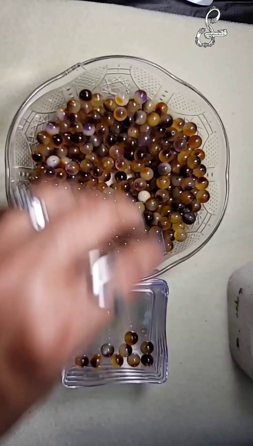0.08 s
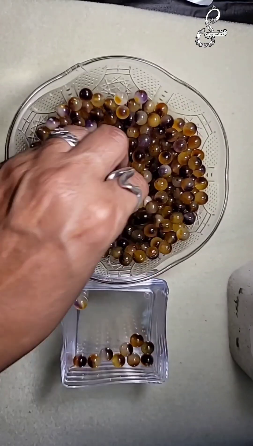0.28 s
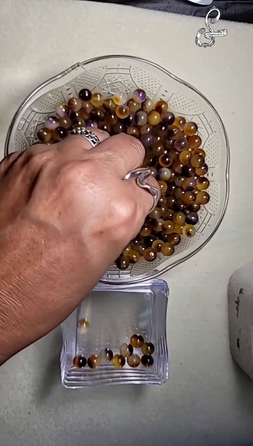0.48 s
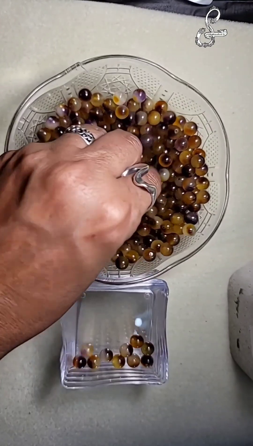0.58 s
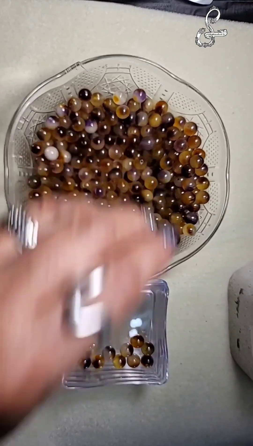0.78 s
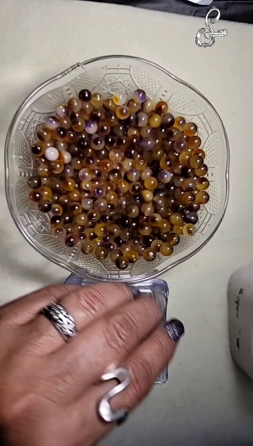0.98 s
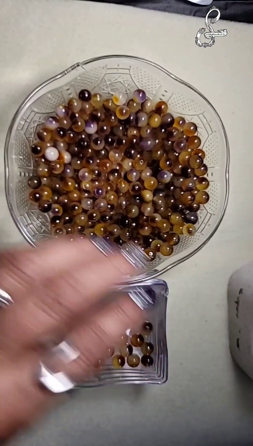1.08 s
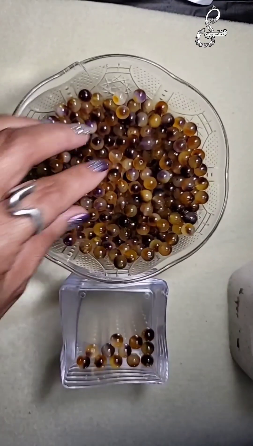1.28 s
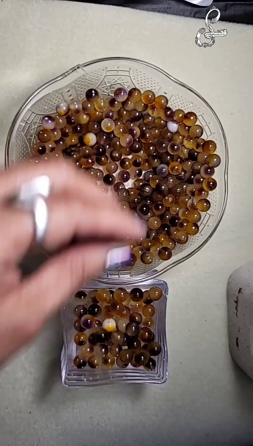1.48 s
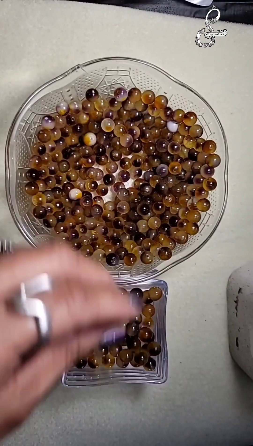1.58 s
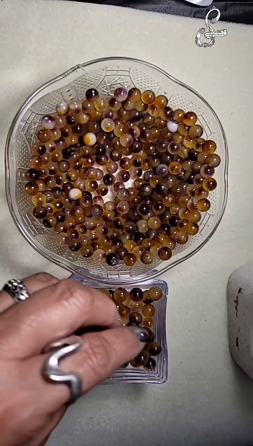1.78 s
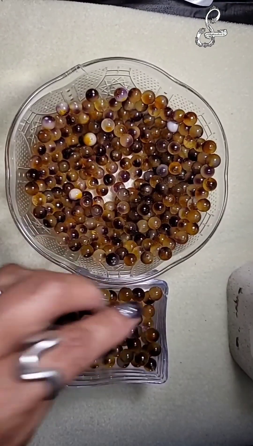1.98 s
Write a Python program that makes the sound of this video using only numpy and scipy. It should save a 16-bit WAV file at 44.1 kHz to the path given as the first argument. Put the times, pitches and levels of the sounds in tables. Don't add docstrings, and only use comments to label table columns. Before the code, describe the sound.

Close stereo phone pickup of stone beads: a brief bright clatter in a box at right, a crunchy bowl rattle at left, another drop, a small scrape, an abrupt cut, low room hum beneath.

```python
import sys
import numpy as np
from scipy import signal
from scipy.fft import rfft, irfft, next_fast_len
from scipy.io import wavfile
from scipy.ndimage import map_coordinates

SR = 44100
rng = np.random.default_rng(int(sys.argv[2]) if len(sys.argv) > 2 else 0)


def volts_from_decibels(level):
    exponent = np.asarray(level, float) / 20
    return 10 ** exponent


def persist_wave(psi):
    counts = np.round(np.clip(psi, -1, 1) * 32767).astype(np.int16)
    wavfile.write(sys.argv[1], SR, np.atleast_2d(counts).T)


N = 88200

# start in seconds, peak in dB, level of the low modes in dB, favoured pitch in Hz.
BOX_HITS = [(0.2274, -9, -6, 1997), (0.232, -15, -4.5, 2024), (0.2437, -12.5, -4, 1975),
            (0.2525, -30, -7.5, 1910), (0.2613, -6, -6.5, 974), (0.2855, -12.5, -8.5, 2906),
            (0.294, -24, -4, 4130), (0.299, -11.5, -4, 2816), (0.3155, -22.5, -8.5, 5510),
            (0.322, -32.5, -13.5, 2890), (0.3553, -41.5, -16, 2370), (0.3678, -37.5, -9.5, 2410),
            (0.3804, -37, -5.5, 2910), (1.1656, -42.5, -6, 4780), (1.1914, -8.5, -3, 2080),
            (1.2106, -9.5, -4, 1974), (1.2169, -17, -2, 4390), (1.2232, -16.5, -8.5, 1610),
            (1.227, -23, -2.5, 5320), (1.2375, -8, -4.5, 3400), (1.254, -29.5, -9, 2030),
            (1.2616, -11.5, -4, 2140), (1.2768, -25, 0.5, 2260), (1.3023, -18.5, -11.5, 5190),
            (1.3178, -22.5, -5, 1230), (1.3534, -26, -7, 5740), (1.3686, -34, -1, 2450),
            (1.4109, -34.5, 1, 2410), (1.4262, -25, -13, 4770), (1.4919, -38.5, -18, 5130)]
# time in seconds, effort in dB.
BOX_ROLLS = [
    [(0, -50.5), (.03, -67), (.07, -72)],
    [(.228, -19), (.25, -38), (.27, -36.5), (.32, -38), (.335, -58), (.37, -54), (.39, -67), (.40, -75)],
    [(1.183, -54.5), (1.192, -32), (1.225, -32), (1.27, -39), (1.29, -55), (1.325, -37.5), (1.34, -54),
     (1.39, -70), (1.43, -70), (1.555, -60), (1.565, -60)],
]
# time in seconds, effort in dB.
BOX_SLIDES = [
    [(.335, -62), (.36, -48), (.39, -55)],
    [(1.40, -59), (1.43, -50.5), (1.55, -62), (1.57, -66)],
]
# start in seconds, peak in dB, level of the low modes in dB, favoured pitch in Hz.
GRAB_HITS = [(1.6, -31.5, 2, 2340), (1.613, -21.5, -5, 1720), (1.622, -22.5, -17, 3000),
             (1.627, -15, -38, 2920), (1.646, -11.5, 0.5, 1286)]
# time in seconds, effort in dB.
GRAB_EFFORT = [(1.57, -75), (1.59, -58), (1.598, -42), (1.609, -48), (1.615, -38), (1.638, -29),
               (1.647, -25.5), (1.66, -22.5)]
# start in seconds, peak in dB, level of the low modes in dB, favoured pitch in Hz.
BOWL_HITS = [(0.4282, -13.5, -5.5, 3220), (0.4398, -17, -3.5, 1960), (0.4483, -6.5, -8.5, 1980),
             (0.4573, -10, -4.5, 2270), (0.4632, -6.5, 0, 1905), (0.4689, -6, -5.5, 1850),
             (0.4733, -6.5, -11, 2150), (0.4842, -4, -6.5, 1780), (0.4899, -1, -4.5, 4410),
             (0.4957, -10.5, -7.5, 3140), (0.5003, -10.5, -10.5, 2650), (0.5078, -0.5, -11.5, 3540),
             (0.5217, -8, -5.5, 3170), (0.5328, -13, -16, 3500), (0.5409, -13.5, -8.5, 4170),
             (0.5507, -14.5, -11.5, 3840), (0.564, -7.5, -25, 5140), (0.5768, -12.5, -6.5, 1800),
             (0.5851, -16.5, -5, 5440), (0.593, -8, -12, 3770), (0.6006, -22, -11, 4740),
             (0.6096, -9, -6.5, 3700), (0.6348, -17, -18, 1980), (0.6405, -7.5, -9, 3780),
             (0.6461, -15, -14.5, 5560), (0.6537, -10, -18, 3940), (0.6588, -23.5, -9, 1440),
             (0.6678, -14, -1, 3320), (0.6748, -16, -4, 3040), (0.6846, -4, -12.5, 2840),
             (0.6913, -14, -9, 1620), (0.7132, -19.5, -12, 5210), (0.7252, -16, -10, 5450),
             (0.733, -18.5, -6.5, 3680), (0.7416, -35, -6, 1290), (0.7506, -20, -14, 4260),
             (0.7578, -14, -1.5, 1550), (0.7729, -14, -13, 2870), (0.7915, -19, -13, 5840),
             (0.8039, -17, -3.5, 4970), (0.8194, -18.5, -4, 2350), (0.8325, -15, -5.5, 2380),
             (0.8391, -12.5, -7, 2950), (0.8454, -14, -3, 1630), (0.854, -13, -11, 2250),
             (0.8647, -24, 0, 2330), (0.8747, -20, -19, 2690), (0.8839, -22, -14, 4200)]
# start in seconds, peak in dB, level of the low modes in dB, favoured pitch in Hz.
LAST_HITS = [(.8988, -24, -11, 1700), (.9147, -16, -6.5, 1750), (.9533, -7, 4.5, 5000),
             (.9718, -16.5, 0, 2280), (.9765, -32, 0.5, 1810), (.9827, -9.5, 1.5, 4270),
             (.9892, -27.5, 1, 2300), (1.025, -21.5, -3, 1870), (1.0509, -27, -5.5, 3900)]
# time in seconds, effort in dB.
STIR_EFFORT = [(.42, -40.5), (.436, -26), (.447, -22.5), (.47, -20.5), (.51, -24.5), (.535, -29),
               (.56, -34.5), (.60, -28), (.63, -34), (.685, -27), (.705, -34.5), (.725, -47), (.80, -38.5),
               (.83, -45), (.86, -30.5), (.89, -52.5), (.94, -57.5), (1.07, -70)]
# start in seconds, pitch in Hz, level in dB.
THUMPS = [
    (0.443, 222.7, -33),
    (0.491, 340, -30.5),
]
# pitch in Hz, level in dB, 60 dB decay in seconds.
BOX_MODES = [(1037, 4, 0.029), (1117, 2, 0.018), (1550, -13.5, 0.046), (2001, -3, 0.044),
             (2051, -1.5, 0.042), (2410, -12, 0.096), (3000, -13.5, 0.014), (3370, -13, .015),
             (4750, -10.5, 0.029), (5520, -11.5, 0.042), (7070, -14, 0.023), (8760, -19, 0.014),
             (9850, -7.5, 0.021)]
# pitch in Hz, level in dB, 60 dB decay in seconds.
BOWL_MODES = [(1248, -5.5, 0.0092), (1655, 0, 0.018), (1830, -1.5, 0.024), (2110, -8, .014),
              (2323, -1.5, 0.014), (2832, -20.5, 0.051), (3180, -11, 0.0092), (3896, -8, 0.013),
              (4880, -12, 0.02), (5450, -17, .012), (6720, -14, 0.012), (10050, -8.5, 0.0082)]
# pitch in Hz, level in dB, 60 dB decay in seconds.
SLIDE_MODES = [(1450, -3, .02), (1750, -2, .03), (2590, 4.5, 0.016), (5020, -6.5, 0.027), (5310, -8.5, .03)]
# frequency in Hz, level in dB.
CRACK = [(600, -28), (900, -15), (1500, -1), (3000, -3.5), (6000, -6.5), (8000, -10), (10300, -6.5),
         (12500, -25.5)]
# frequency in Hz, correlation from 0 to 1.
CRACK_ALIKE = [(700, 0.53), (2000, 0.87), (5000, 0.18), (10000, 0.21)]
# frequency in Hz, left over right in dB.
BOX_SIDE = [(400, -14), (1150, 6.5), (2100, -3.3), (3700, -0.5), (6700, -3), (12000, -5)]
# frequency in Hz, left over right in dB.
BOWL_SIDE = [(400, -1), (1100, 9), (2100, 3), (3700, 5), (6700, 1), (12000, 1)]
# pitch in Hz, rms level in dB.
HUM = [(60, -42), (121, -53.5), (150, -53)]
# frequency in Hz, level in dB.
FLOOR = [(15, -31), (25, -18.5), (68, -4), (161, -8), (979, -30), (1480, -37), (10000, -61.5),
         (12000, -81.5), (22000, -120)]
# frequency in Hz, correlation from 0 to 1.
FLOOR_ALIKE = [(60, 0.87), (250, 0.96), (600, 0.45), (2000, 0.093)]
# time in seconds, gain in dB.
EDIT = [
    (0, 0.5),
    (1.653, 1),
    (1.658, -45.5),
    (1.70, -53),
    (1.72, -90.5),
    (1.93, -101),
    (1.965, -34),
    (1.975, -20),
    (2, -3.5),
]
# pitch in Hz, level in dB.
AFTER = [(2810, -74), (10400, -63)]

FLOOR_DB, TOP_HZ = -37, 11700
LOW_HZ = 2500
FAVOUR_DB, FAVOUR_OCTAVES = 9.5, 0.12
RISE_S = 0.0003


def box():
    hits = clatter(BOX_HITS, BOX_MODES, ring_db=-6.5, damp=0.96, crack_db=-9.5, crack_t60=0.028,
                   tail_db=-13.5, spread=0.35, scatter_db=2.0)
    rolls = swarm(BOX_ROLLS, spiky_db=6.5, over_db=2.3, dull_under_db=-41.0, count=1200)
    rolls = clatter(rolls, BOX_MODES, ring_db=-13.0, damp=0.68, crack_db=-3, crack_t60=0.011,
                    tail_db=-21.5, spread=0.84, scatter_db=6.5)
    slides = swarm(BOX_SLIDES, spiky_db=2.5, over_db=2.2, dull_under_db=-90, count=900)
    slides = clatter(slides, SLIDE_MODES, ring_db=-6, damp=1.1, crack_db=-14, crack_t60=0.014,
                     tail_db=-20.5, spread=1.0, scatter_db=2.5)
    rubs = swarm([GRAB_EFFORT], spiky_db=2.0, over_db=0.5, dull_under_db=-64.5, count=1300)
    grab = clatter(np.vstack([GRAB_HITS, rubs]), BOWL_MODES, ring_db=-4, damp=0.95, crack_db=-6.5,
                   crack_t60=0.025, tail_db=-14, spread=0.2, scatter_db=2.5)
    return placed(hits + rolls + slides + grab, BOX_SIDE, lead_s=-0.000096, low_hz=866)


def bowl():
    hits = clatter(BOWL_HITS, BOWL_MODES, ring_db=-5, damp=0.69, crack_db=-12.5, crack_t60=0.0067,
                   tail_db=-8, spread=0.51, scatter_db=2.04)
    last = clatter(LAST_HITS, BOWL_MODES, ring_db=-3.5, damp=0.5, crack_db=-10.5, crack_t60=0.014,
                   tail_db=-12.5, spread=0.47, scatter_db=1.5)
    stir = swarm([STIR_EFFORT], spiky_db=3.0, over_db=-1.5, dull_under_db=-28, count=1100)
    stir = clatter(stir, BOWL_MODES, ring_db=-4, damp=1.36, crack_db=-0.5, crack_t60=0.0076,
                   tail_db=-9.0, spread=0.72, scatter_db=4.0)
    return placed(hits + last + stir, BOWL_SIDE, lead_s=0.00008, low_hz=710) + thumps()


def thumps():
    out = np.zeros(N)
    for start, hz, db in THUMPS:
        since = np.maximum(np.arange(N) / SR - start, 0)
        swell = since / 0.032 * np.exp(1 - since / 0.014)
        out += volts_from_decibels(db) * swell * np.sin(2 * np.pi * hz * since)
    return out


def clatter(rows, modes, ring_db, damp, crack_db, crack_t60, tail_db, spread, scatter_db):
    s, db, low_db, spot_hz = np.transpose(rows)
    t = np.arange(SR // 8) / SR
    out = np.zeros((2, N))
    busy = slice(int(s.min() * SR), int(s.max() * SR) + len(t))
    rise = np.exp(-1 / (RISE_S * SR))
    for hz, level_db, t60 in modes:
        draw = rng.standard_normal((len(s), 3))
        near = np.exp(-(np.log2(hz / spot_hz) / FAVOUR_OCTAVES) ** 2)
        mode_db = db + level_db + ring_db + low_db * (hz < LOW_HZ)
        mode_db = mode_db + scatter_db * draw[:, 0] + FAVOUR_DB * (near - 0.22)
        strike = volts_from_decibels(mode_db) * np.exp(1j * 0.25 * draw[:, 1])
        apart = spread * np.sqrt(hz / 2000) * np.outer([1, -1], draw[:, 2])
        strikes = [(train(s, z.real) + 1j * train(s, z.imag))[busy] for z in strike * np.exp(1j * apart)]
        pole = volts_from_decibels(-60 / (t60 * damp * SR)) * np.exp(2j * np.pi * hz / SR)
        resonance = np.convolve([1, -pole], [1, -rise * pole])
        out[:, busy] += signal.lfilter([1 - rise], resonance, strikes).imag
    fade = volts_from_decibels(-120 * t / crack_t60) + volts_from_decibels(2 * tail_db - 120 * t / 0.09)
    fade = fade * (1 - np.exp(-t / 0.00025))
    power = signal.fftconvolve(train(s, volts_from_decibels(2 * (db + crack_db))), fade)[:N]
    return out + np.sqrt(np.abs(power)) * rush(CRACK, CRACK_ALIKE)


def swarm(tables, spiky_db, over_db, dull_under_db, count):
    rows = []
    for table in tables:
        s, db = np.transpose(table)
        draw = rng.random((count, 3))
        at = s[0] + draw[:, 0]
        effort_db = np.interp(at, s, db)
        spike = np.minimum(-np.log(1 - draw[:, 1]), 3) - 1
        size_db = effort_db + over_db + spiky_db * spike
        low_db = 0.43 * np.minimum(effort_db - dull_under_db, 0)
        spot_hz = 2300 * 3.2 ** draw[:, 2]
        rows.append(np.transpose([at, size_db, low_db, spot_hz])[at < s[-1]])
    return np.vstack(rows)


def placed(x, side, lead_s, low_hz):
    way = np.array([[0.5], [-0.5]])

    def response(hz):
        balance = volts_from_decibels(way * along(side, hz))
        lead = np.exp(2j * np.pi * hz * lead_s * way)
        bass_loss = (1j * hz / (low_hz + 1j * hz)) ** 2 / (1 + (low_hz / (hz + 1)) ** 10)
        return balance * lead * bass_loss

    return filtered(x, response)


def room():
    t = np.arange(N) / SR
    hum = np.zeros(N)
    for hz, db in HUM:
        level = np.sqrt(2) * volts_from_decibels(db + 1.7 * wobble(5.6))
        hum += level * np.sin(2 * np.pi * hz * t + 0.5 * wobble(9.1))
    rumble = volts_from_decibels(FLOOR_DB - 4.5 + 1.5 * wobble(8.9)) * rush(FLOOR, FLOOR_ALIKE)
    return volts_from_decibels([[-0.4], [0.4]]) * (hum + rumble)


def rush(spectrum, alike):
    def mid_side(hz):
        turn = np.arccos(np.clip(along(alike, hz), -1, 1)) / 2
        return volts_from_decibels(along(spectrum, hz)) * [np.cos(turn), np.sin(turn)]

    mid, side = filtered(rng.standard_normal((2, N)), mid_side)
    return unit(np.array([mid + side, mid - side]))


def wobble(rate):
    knots = rng.standard_normal(int(N * rate / SR) + 4)
    return map_coordinates(knots, [np.arange(N) * rate / SR])


def train(s, size):
    return np.bincount(np.clip(np.round(s * SR).astype(int), 0, N - 1), size, N)


def filtered(x, response):
    m = next_fast_len(N + 8192)
    return irfft(rfft(x, m) * response(np.fft.rfftfreq(m, 1 / SR)), m)[..., :N]


def along(points, hz):
    f, v = np.transpose(points)
    return np.interp(np.log(hz + 1), np.log(f + 1), v)


def unit(x):
    return x / np.sqrt(np.mean(x ** 2) + 1e-20)


def after_ring():
    t = np.arange(N) / SR
    fade_db = np.interp(t, [1.65, 1.655, 1.70, 1.715], [-64.5, -4, -10.0, -53])
    tones = sum(volts_from_decibels(db) * np.sin(2 * np.pi * hz * t) for hz, db in AFTER)
    return volts_from_decibels(fade_db + 2.5 * wobble(90)) * tones


def scene():
    return box() + bowl() + room()


def roll_off(x):
    return signal.sosfilt(signal.butter(12, 12740, fs=SR, output="sos"), x)


def record(dry):
    heard = filtered(dry, lambda hz: 1 / (1 + (hz / TOP_HZ) ** 56))
    cut = volts_from_decibels(np.interp(np.arange(N) / SR, *np.transpose(EDIT)))
    return roll_off(heard * cut + after_ring())


dry = scene()
out = record(dry)
persist_wave(out)
```